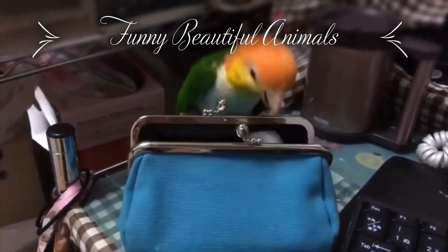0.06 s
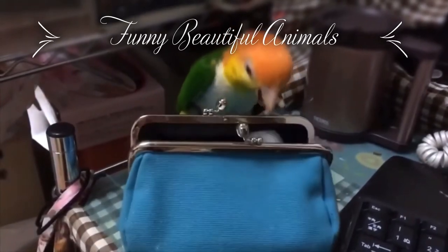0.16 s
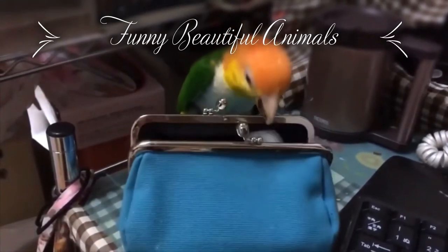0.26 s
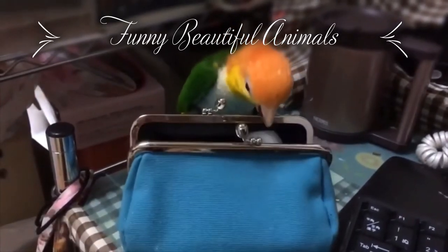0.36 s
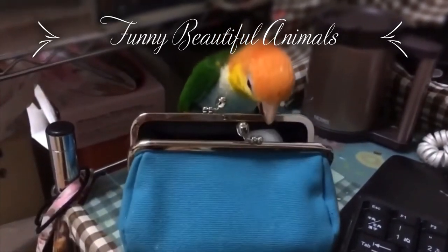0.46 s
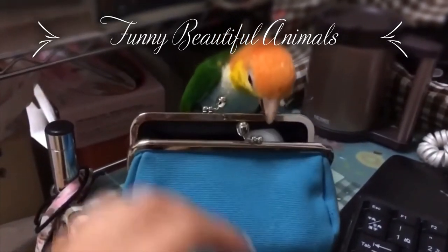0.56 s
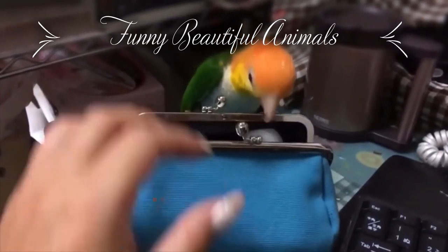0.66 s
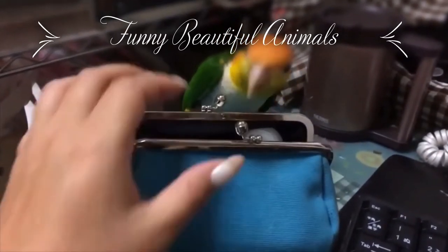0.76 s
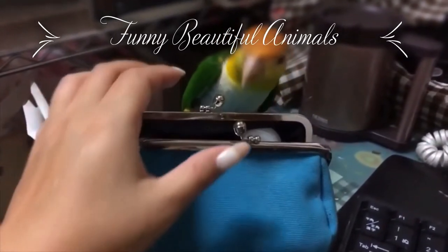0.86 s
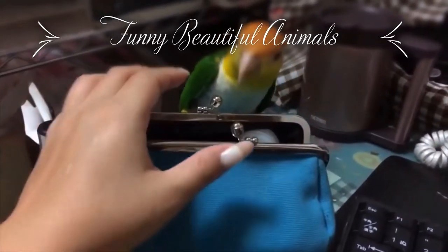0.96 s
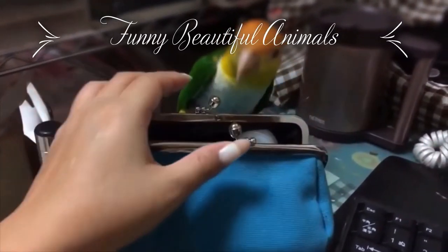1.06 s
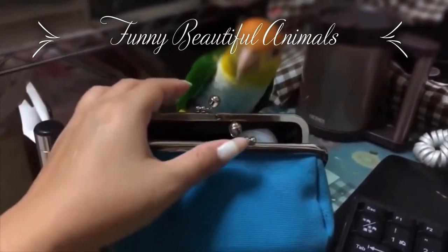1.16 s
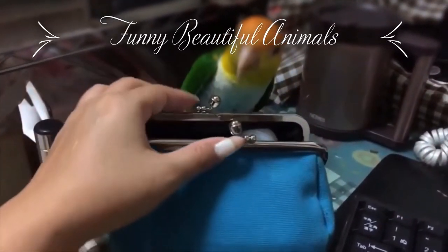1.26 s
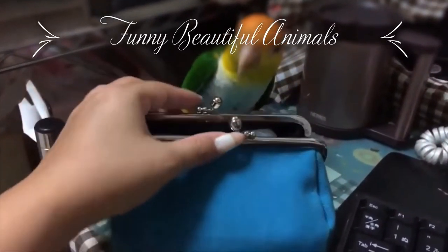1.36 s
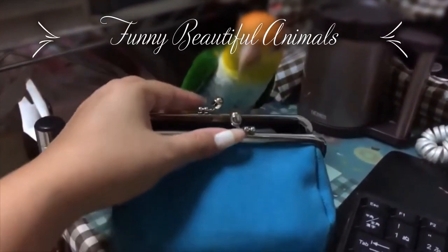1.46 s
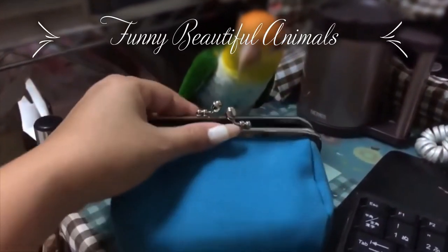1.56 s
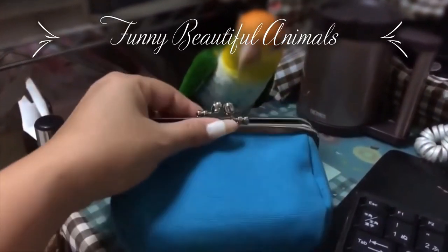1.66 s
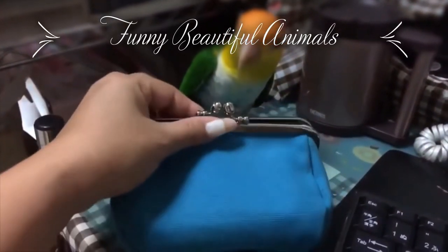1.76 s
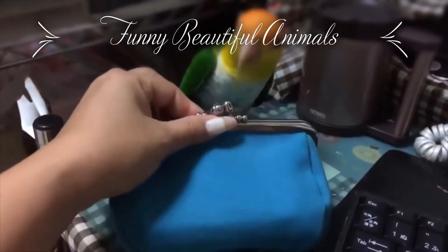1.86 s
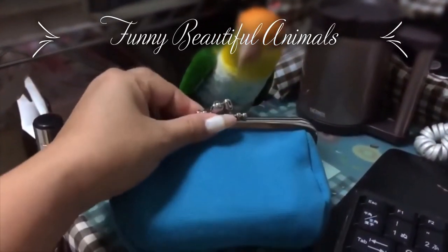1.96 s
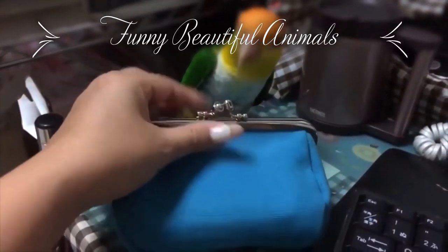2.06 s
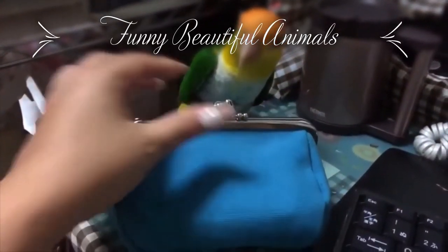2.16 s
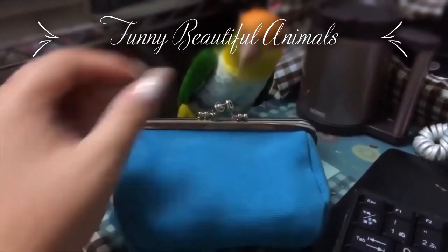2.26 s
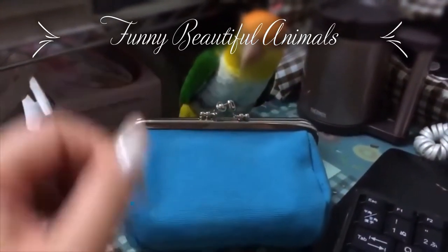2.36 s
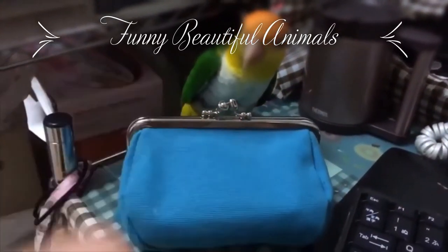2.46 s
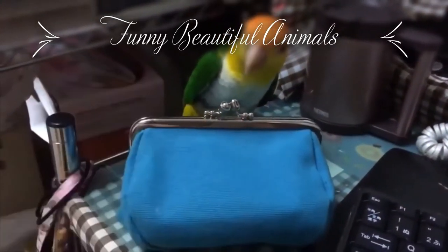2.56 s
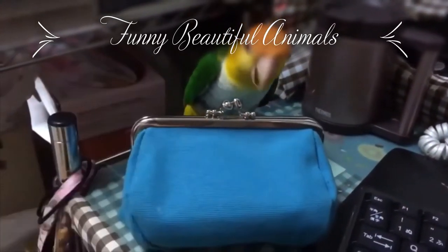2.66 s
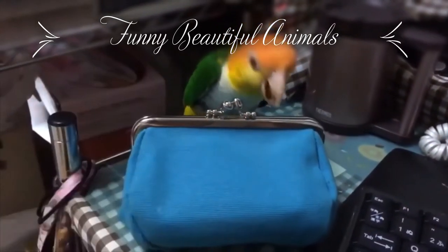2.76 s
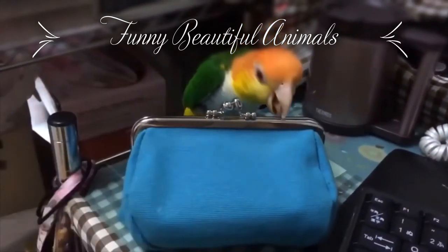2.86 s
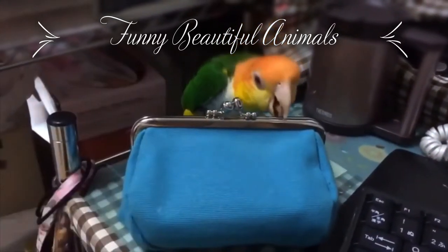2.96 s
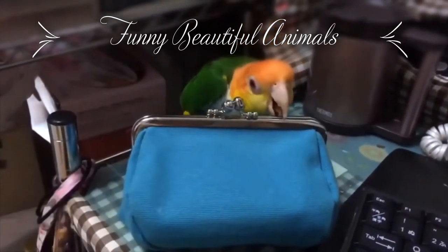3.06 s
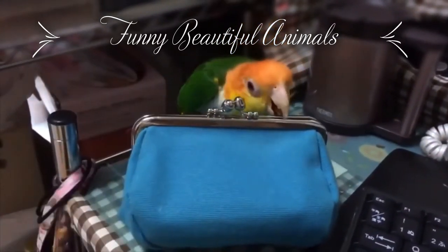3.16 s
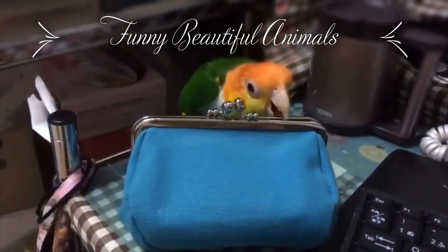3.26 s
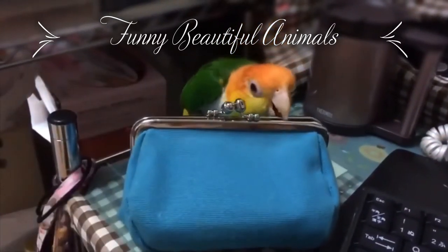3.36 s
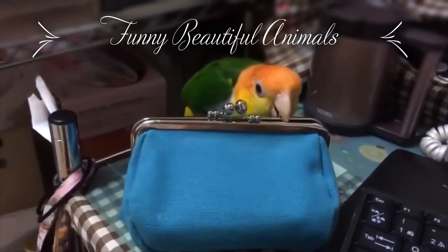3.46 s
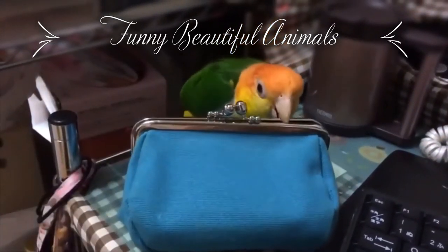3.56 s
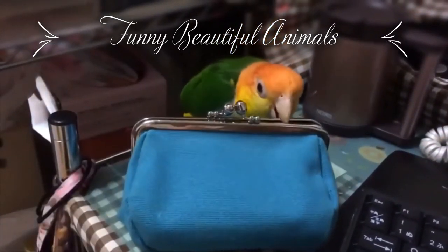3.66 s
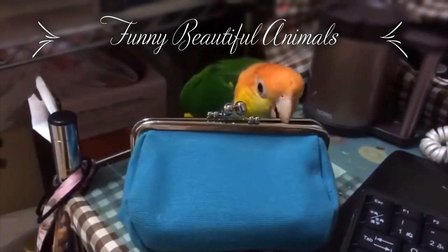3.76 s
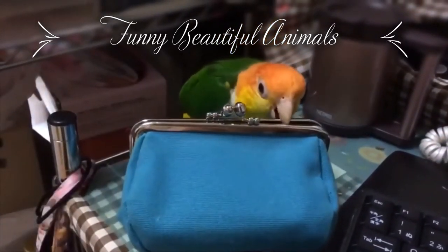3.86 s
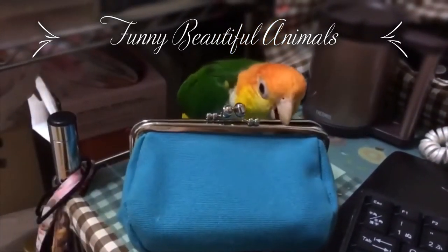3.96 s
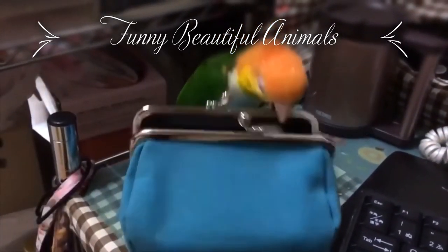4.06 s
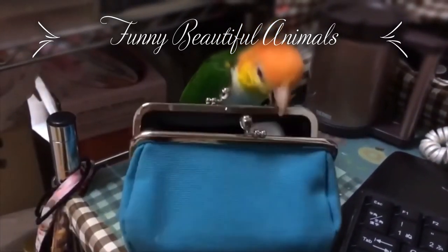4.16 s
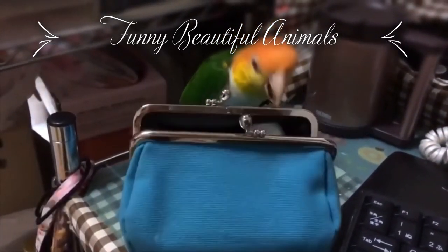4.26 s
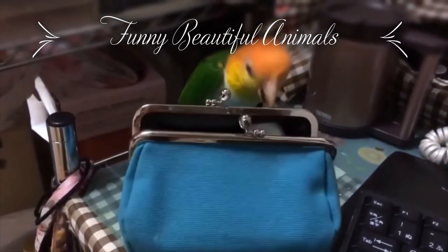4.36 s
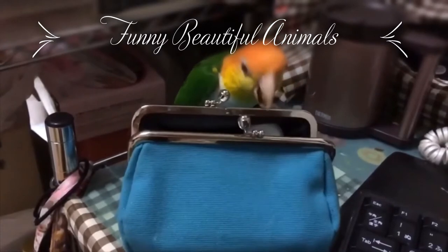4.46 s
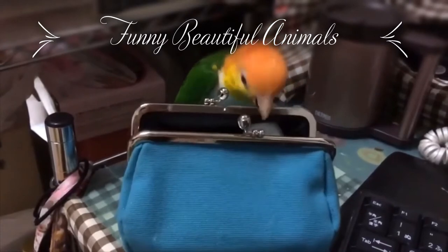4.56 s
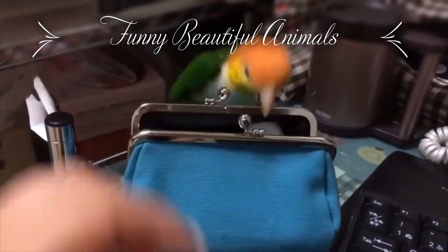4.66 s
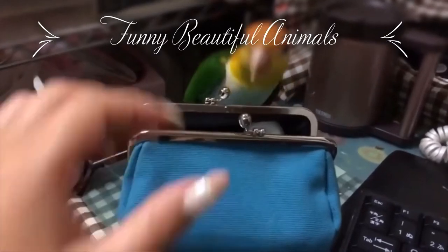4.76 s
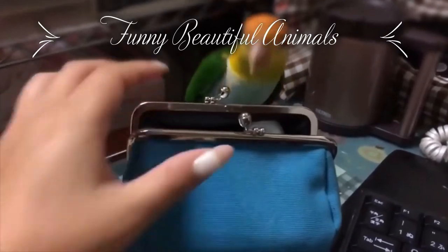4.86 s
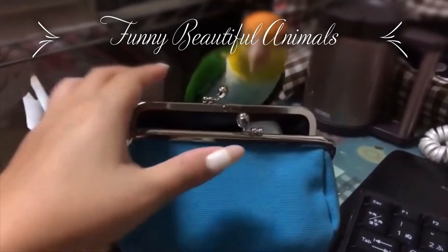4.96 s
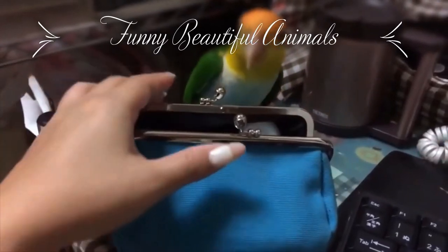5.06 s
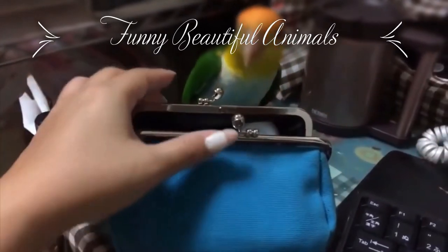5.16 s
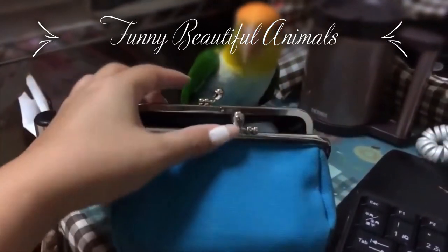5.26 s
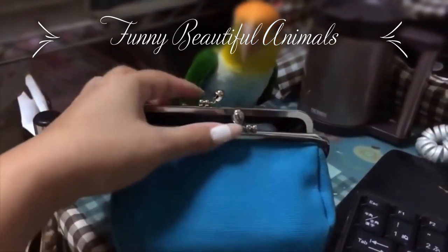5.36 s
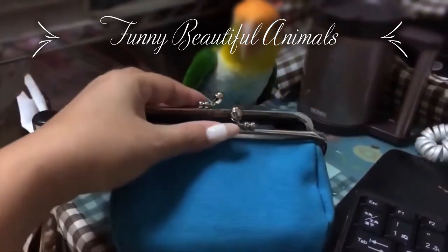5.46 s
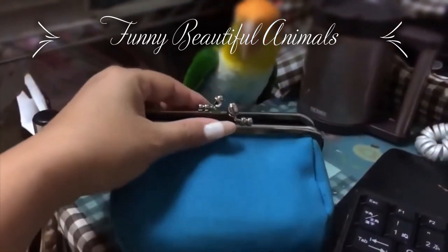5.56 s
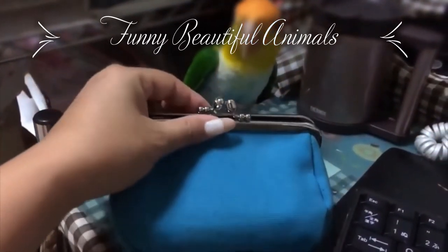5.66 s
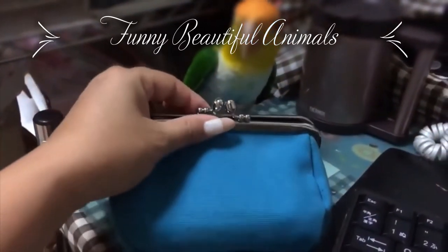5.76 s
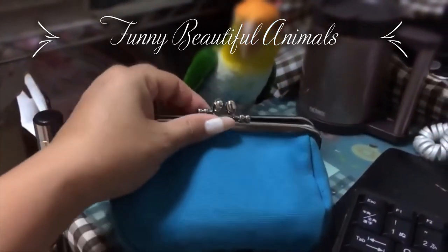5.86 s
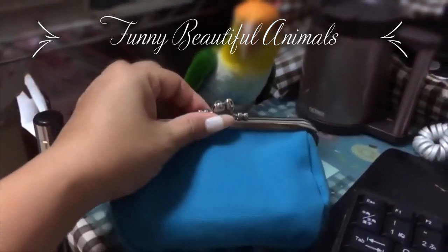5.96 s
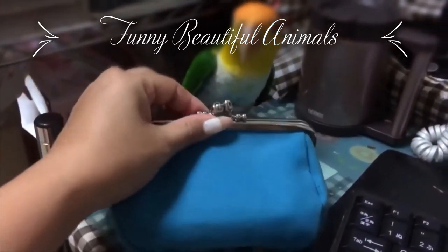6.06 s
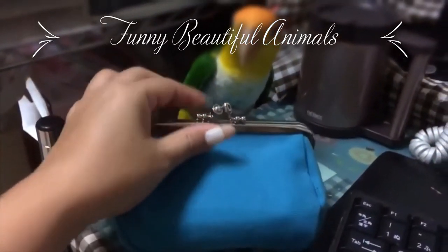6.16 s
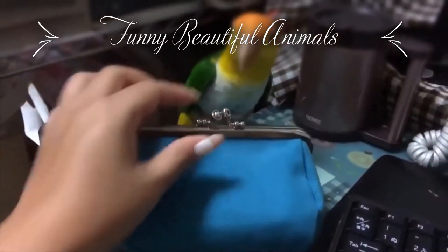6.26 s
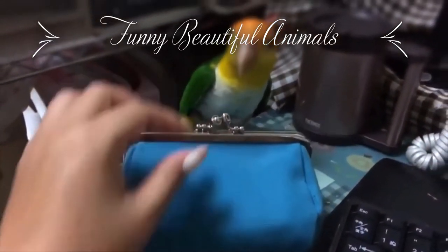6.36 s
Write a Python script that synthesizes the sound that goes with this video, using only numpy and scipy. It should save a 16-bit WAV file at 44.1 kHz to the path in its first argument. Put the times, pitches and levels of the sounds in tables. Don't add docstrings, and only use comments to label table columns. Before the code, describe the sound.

Quiet room noise with a low wavering hum. Tiny ticks, then one short falling parrot squawk. A bright metallic click precedes a hard, loud clasp snap with brief rattle. After sparse ticks and soft cloth rustle, the clasp springs open and more ticks cluster; the bird squeaks rapidly, then another click and equally loud snap. Close microphone, short indoor reflections.

```python
import sys
import numpy as np
from scipy import signal
from scipy.io import wavfile
from scipy.ndimage import uniform_filter1d

SR = 44100
rng = np.random.default_rng(int(sys.argv[2]) if len(sys.argv) > 2 else 0)


def persist_wave(psi):
    counts = np.round(np.clip(psi, -1, 1) * 32767).astype(np.int16)
    wavfile.write(sys.argv[1], SR, np.atleast_2d(counts).T)


def volts_from_decibels(level):
    exponent = np.asarray(level, float) / 20
    return 10 ** exponent


N = 283122

# f/Hz, level/dB
METAL_GRIT = [(300, -28.5), (900, -12), (1700, 1), (3300, -7), (6000, -4), (10000, -8.5), (13000, -11.5),
              (16000, -23)]


def evened(x):
    return x / np.sqrt(np.mean(x ** 2) + 1e-20)


def drift(count, span):
    return evened(uniform_filter1d(rng.standard_normal(count), span))


def slow_drift(count, span):
    smooth = uniform_filter1d(rng.standard_normal(count), span)
    return evened(uniform_filter1d(smooth, span))


def read(points, hz):
    f, value = np.transpose(points)
    return np.interp(np.log(hz + 1), np.log(f + 1), value)


def add(mix, s, sound):
    part = mix[round(s * SR):][:len(sound)]
    part += sound[:len(part)]


def resonate(x, hz, width):
    turn = np.exp(2j * np.pi * hz * np.arange(len(x)) / SR)
    r = np.exp(-np.pi * width / SR)
    return 2 * (turn * signal.lfilter([1 - r], [1, -r], x / turn)).real


def resonances(x, modes):
    return sum(volts_from_decibels(db) * resonate(resonate(x, f, w), f, w) for f, w, db in modes)


def noise(spectrum, count, patchy_db):
    hz = np.fft.rfftfreq(1024, 1 / SR)
    a, b, patches = rng.standard_normal((count // 256 + 5, 513, 3)).T
    patches = evened(uniform_filter1d(uniform_filter1d(patches, 12, 0), 10, 1))
    z = (a + 1j * b) * volts_from_decibels(read(spectrum, hz)[:, None] + patchy_db * patches)
    return evened(signal.istft(z, nperseg=1024, noverlap=768)[1][:count])


def ring(modes):
    t = np.arange(SR // 3) / SR
    return sum(volts_from_decibels(db - 60 * t / t60) * np.sin(2 * np.pi * hz * t) for hz, db, t60 in modes)


def blow(modes, rebounds, grit_db, grit_t60, grit_spectrum):
    kicks = np.zeros(300)
    for s, gain in rebounds:
        kicks[round(s * SR)] += gain
    out = signal.fftconvolve(kicks, ring(modes))[:4000]
    fade = volts_from_decibels(grit_db - 60 * np.arange(4000) / SR / grit_t60)
    grit = noise(grit_spectrum, count=4000, patchy_db=1.5) * fade
    return out / abs(out).max() + grit


def hum():
    # f/Hz, level/dB
    faint_lines = [(242.2, -68.5), (301.5, -72.5), (360.7, -77.5), (958.2, -75.5), (1104, -72.5),
                   (1674, -76)]
    # f/Hz, level/dB
    main_lines = [(58.35, -50.5), (120, -59.5)]
    # t/s, hold/s, change/dB
    dips = [(0, 0.19, -7.5), (0.608, 0.15, -4.5), (0.903, 0.34, -6), (1.961, 0.41, -10), (2.683, 0.41, -7),
            (3.225, .08, 0.5), (3.363, 0.045, -7.5), (4.594, 0.086, -6), (5.039, 0.1, -8.5),
            (5.62, .07, -4), (6.031, 0.18, -8.5)]
    fall_s, back_s, waver_s = 0.013, 0.11, 0.016
    t = np.arange(N) / SR
    dips_db = np.zeros(N)
    for s, hold, db in dips:
        dips_db += np.interp(t, [s - fall_s, s, s + hold, s + hold + back_s], [0, db, db, 0])
    out = np.zeros(N)
    for (hz, db), waver_db in zip(main_lines, (1.95, 3.0)):
        waver = slow_drift(N, round(waver_s * SR))
        out += volts_from_decibels(db + dips_db + waver_db * waver) * np.sin(2 * np.pi * hz * t)
    for hz, db in faint_lines:
        out += volts_from_decibels(db - 2.5 + .8 * dips_db) * evened(resonate(rng.standard_normal(N), hz, 3))
    return np.sqrt(2) * out


def air():
    # f/Hz, level/dB per Hz
    room_noise = [(15, -33), (25, -8), (66, -1), (131, -9.5), (172, -14), (245, -14), (651, -19.5),
                  (902, -21.5), (1120, -13.5), (1220, -18.5), (2400, -24.5), (2980, -33), (10400, -42.5),
                  (14400, -61), (16500, -74.5)]
    # f/Hz, width/Hz, level/dB
    fan_modes = [(1012, 180, -72.5), (1550, 540, -82), (300, 27, -79.5)]
    fan = np.zeros(N)
    for f, w, db in fan_modes:
        fan += volts_from_decibels(db) * evened(resonate(resonate(rng.standard_normal(N), f, w), f, w))
    hiss = volts_from_decibels(-81) * rng.standard_normal(N)
    return volts_from_decibels(-57.5) * noise(room_noise, count=N, patchy_db=2.32) + fan + hiss


def rustle():
    # start/s, peak/s, end/s, peak level/dB
    strokes = [
        (0, 0, 0.076, -59.5),
        (1.599, 1.7, 1.69, -61),
        (2.247, 2.49, 2.8, -72),
        (2.915, 2.96, 3.0, -72),
        (4.125, 4.127, 4.2, -48),
        (4.6, 4.612, 4.63, -53),
        (4.669, 4.695, 4.715, -56.5),
        (4.705, 4.77, 4.82, -54),
    ]
    # f/Hz, level/dB per Hz
    cloth = [(470, -40), (800, -8), (1660, -4.5), (1970, 4), (2570, -4.5), (8770, -11.5), (14700, -25.5),
             (16000, -30)]
    edge_db = -15.5
    out = np.zeros(N)
    for start, peak, end, db in strokes:
        t = np.arange(start, end, 1 / SR)
        level_db = db + np.interp(t, [start, peak, end], [edge_db, 0, edge_db])
        grain = volts_from_decibels(2.5 * drift(len(t), 200))
        brush = evened(grain * noise(cloth, count=len(t), patchy_db=-2.5))
        add(out, max(start, 0), volts_from_decibels(level_db) * brush * signal.windows.tukey(len(t), .1))
    return out


def ticks():
    # t/s, peak level/dB, f/Hz
    tick_events = [(0.3794, -51, 2690), (.4324, -44, 2100), (0.461, -53, 2280), (0.629, -49.5, 2250),
                   (.683, -57, 5000), (0.723, -52, 3350), (1.671, -53, 3400), (1.917, -45.5, 8500),
                   (2.934, -48, 3470), (2.969, -36, 2620), (3.051, -48, 2350), (3.589, -50, 3360),
                   (3.865, -51, 2308), (3.8982, -42.5, 2200), (4.143, -32, 4300), (4.166, -49, 3900),
                   (4.174, -39, 4100), (4.201, -49.5, 2500), (4.3244, -43.5, 2290), (4.466, -37.5, 3900),
                   (4.505, -45.5, 3984), (4.5645, -38, 4800), (4.616, -33.5, 2400), (4.6376, -62, 7000),
                   (4.6992, -41, 3030), (4.758, -47, 3460), (5.667, -52, 3400), (5.714, -50, 4960),
                   (5.985, -38, 8500)]
    scrape_s, ring_cycles = .007, 20
    out, t = np.zeros(N), np.arange(2000) / SR
    for s, db, hz in tick_events:
        length_s = np.clip(scrape_s + ring_cycles / hz, .003, .06)
        scratch = rng.standard_normal(2000) * volts_from_decibels(-60 * t / length_s)
        dull = evened(resonate(scratch, 3000, 4900))
        pitched = evened(resonate(scratch, hz, 700) + 0.32 * resonate(scratch, 0.8 * hz, 600))
        tick = 0.25 * dull + pitched
        add(out, s, volts_from_decibels(db) * tick / abs(tick).max())
    return out


def call(rows, trill_hz, trill_depth, rough_high):
    # f/Hz, width/Hz, level/dB
    throat_modes = [(1800, 1900, 6), (3130, 2400, 11), (4800, 1300, 14), (8350, 450, 10.5)]
    rough_low, break_hz, break_width_hz = 0.35, 2090, 430
    beat_sag = .15
    s, *columns = np.transpose(rows)
    t = np.arange(s[0], s[-1], 1 / SR)
    level_db, hz = (np.interp(t, s, c) for c in columns)
    pressed = .5 - .5 * np.tanh((hz - break_hz) / break_width_hz)
    rough = np.clip(rough_high + (rough_low - rough_high) * pressed, 0, 1)
    depth = trill_depth * np.clip(5 * rough, 0, 1)
    effort = volts_from_decibels(level_db - level_db.max())

    beat = np.cos(2 * np.pi * trill_hz * (t - t[0]) + 0.26 * drift(len(t), 600))
    jitter = (.012 + .15 * rough) * slow_drift(len(t), 40)
    hz = hz * (1 - beat_sag * effort * depth * (.5 + .5 * beat) + jitter)
    turns = np.cumsum(hz) / SR
    sharp = np.clip(4.0 * rough, 0, 1)
    pulses = -sum(sharp ** max(k - 2, 0) * np.cos(2 * np.pi * k * turns) for k in range(1, 6))
    breath = 1.6 * rough * rng.standard_normal(len(t))
    voice = evened(resonances(evened(pulses) + breath, throat_modes))
    chop = 1 - np.clip(depth, 0, 1) * (1 - (.5 + .5 * beat) ** 1.7)
    return s[0], volts_from_decibels(level_db) * voice * chop * signal.windows.tukey(len(t), .1)


def parrot():
    # t/s, level/dB, f/Hz
    calls = [
        [(.775, -77, 2350), (.812, -54.5, 2756), (.83, -49.5, 2350), (.845, -42, 2008), (.86, -38, 1876),
         (.864, -40.5, 1720), (.88, -37, 1730), (.893, -56, 1580)],
        [(5.0546, -65, 2790), (5.08, -53.5, 2810), (5.09, -46, 2745), (5.096, -41.5, 2764), (5.103, -56, 3290),
         (5.114, -52, 3400)],
        [(5.109, -57, 2966), (5.131, -46.5, 2850), (5.155, -46.5, 2854), (5.17, -54.5, 2900),
         (5.205, -64, 3140)],
        [(5.21, -70, 3920), (5.225, -67, 4170), (5.248, -66, 3470)],
        [(5.248, -54, 3050), (5.262, -45.5, 2900), (5.303, -51.5, 2930), (5.315, -72, 2750)],
        [(5.265, -47, 2450), (5.292, -53, 2390), (5.304, -58, 2350)],
    ]
    # trill rate/Hz, depth 0-1, roughness of high notes 0-1
    trills = [(185, 0.4, .06), (141, 0.76, 0.45), (87, 0.86, 0.46), (110, .7, 0.1), (142.2, 0.9, 0.1),
              (121, 1, 0.1)]
    out = np.zeros(N)
    for rows, trill in zip(calls, trills):
        add(out, *call(rows, *trill))
    return out


def frame_thumps():
    # t/s, peak level/dB, f/Hz, t60/s
    thumps = [(1.686, -42, 930, 0.012), (1.921, -26, 300, 0.01), (2.935, -43.5, 460, 0.036),
              (2.968, -40, 597, 0.0087), (4.148, -28, 182.9, 0.062), (4.152, -41.5, 230.4, 0.18),
              (4.15, -33, 970, 0.034), (4.762, -44.5, 786, 0.015), (5.668, -49, 1260, 0.0098),
              (5.988, -32.5, 300, 0.023), (5.997, -28.5, 84, 0.096), (1.93, -38, 85, 0.1),
              (5.672, -47.5, 846, 0.043)]
    out = np.zeros(N)
    for s, db, hz, t60 in thumps:
        add(out, s, volts_from_decibels(db) * ring([(hz, 0, t60), (2.3 * hz, -10, .5 * t60)]))
    return out


def ball_touches():
    # t/s, peak level/dB
    touches = [
        (1.7177, -16),
        (1.9038, -27),
        (5.7376, -13.5),
        (5.9736, -27),
    ]
    # f/Hz, level/dB, t60/s
    ball_modes = [(1390, -12, .02), (1620, -16, .012), (3500, -5, 0.005), (4150, -1, .005),
                  (5155, 1, 0.005), (6460, -5, .003), (7950, -6, 0.005), (9390, -6, 0.006),
                  (10600, -10, .004)]
    # f/Hz, level/dB
    bright_grit = [(1500, -30), (2500, -28), (3600, -6), (5200, 0), (10000, -3), (16000, -18)]
    rebounds = [(0, 1), (.0007, 0.15), (.0013, -.15), (.0042, 0.12)]
    out = np.zeros(N)
    for s, db in touches:
        add(out, s, volts_from_decibels(db) * blow(ball_modes, rebounds, -18, 0.016, bright_grit))
    return out


def spring_open():
    # t/s, peak level/dB
    slips = [
        (4.1215, -34),
        (4.1236, -19),
        (4.1243, -18),
        (4.1251, -18),
        (4.1261, -11.5),
        (4.1271, -18),
        (4.1282, -18),
        (4.1294, -19),
        (4.1308, -25),
    ]
    # f/Hz, level/dB, t60/s
    slip_modes = [(650, -19, 0.015), (1150, -12, .015), (2100, -1, 0.005), (3400, 4, 0.006),
                  (4100, 4, 0.006), (5600, 0, .004), (7000, 1, 0.003), (9000, -2, 0.003),
                  (11500, -2, 0.003), (14000, -5, .003)]
    out = np.zeros(N)
    for k, (s, db) in enumerate(slips):
        add(out, s, (-1) ** k * volts_from_decibels(db) * blow(slip_modes, [(0, 1)], -13, 0.008, METAL_GRIT))
    return out


def snaps():
    # t/s, peak level/dB, frame rattle level/dB
    snap_events = [
        (1.93, 0, -26),
        (5.997, -1, -25.5),
    ]
    # f/Hz, level/dB, t60/s
    snap_modes = [(403, -9, .012), (1220, -1.5, .005), (2350, -13.5, 0.014), (3510, -6, 0.0084),
                  (4830, -11.5, 0.011), (7234, -12, .007), (8500, -10, 0.008), (9550, -11.5, 0.0054),
                  (11010, -12.5, 0.007)]
    # f/Hz, width/Hz, level/dB
    frame_modes = [(1540, 210, -8.5), (2270, 160, 0.5), (2420, 100, -5), (3400, 200, -6.5), (4100, 350, -7),
                   (11000, 230, -11)]
    # f/Hz, level/dB per Hz
    coins = [(120, -51.5), (200, -19.5), (702, -14), (842, -15), (1330, -7), (1590, -13.5), (2210, -5),
             (6710, -14), (11200, -13.5), (15500, -25)]
    rebounds = [(0, .45), (.00016, -1), (.0011, .35), (.0017, -.25)]
    out, t = np.zeros(N), np.arange(SR // 4) / SR
    count = len(t)
    for s, db, rattle_db in snap_events:
        add(out, s, volts_from_decibels(db - 2.3) * blow(snap_modes, rebounds, -14, .012, METAL_GRIT))
        knocks = rng.standard_normal(count) * (rng.random(count) < .008)
        knocks *= volts_from_decibels(1.2 * drift(count, 250))
        rattle = evened(resonances(knocks, frame_modes))
        scatter = noise(coins, count=count, patchy_db=3.0) * volts_from_decibels(1.9 * drift(count, 200))
        swell = 1 - np.exp(-(t / 0.0083) ** 2)
        add(out, s, volts_from_decibels(rattle_db - 60 * t / 0.17) * swell * (0.83 * rattle + scatter))
    return out


def room(x):
    # f/Hz, t60/s
    decay = [(100, 0.053), (400, 0.15), (1000, 0.1), (2300, 0.1), (5000, 0.27), (10000, 0.086),
             (16000, 0.03)]
    # f/Hz, level/dB
    colour = [(100, -4.5), (700, -7.5), (1200, 4), (2300, 6), (3500, -1.5), (6000, -3), (11000, 4),
              (16000, 0)]
    build_up_s = .011
    taps = np.zeros(SR // 2)
    at = np.arange(100, SR // 2 - 10, 10)
    taps[at + rng.integers(0, 10, len(at))] = rng.choice([-1., 1.], len(at))
    taps *= 1 - np.exp(-(np.arange(len(taps)) / (build_up_s * SR)) ** 2) + 0.47
    hz, t, z = signal.stft(taps, SR, nperseg=256)
    z = z * volts_from_decibels(read(colour, hz)[:, None] - 60 * t / read(decay, hz)[:, None])
    tail = signal.istft(z, SR, nperseg=256)[1]
    return signal.fftconvolve(x, tail / np.linalg.norm(tail))[:N]


def ducked(floor, loud):
    power_db = 10 * np.log10(abs(uniform_filter1d(loud ** 2, 800)) + 1e-12)
    fall_db = np.arange(N) * 60. / SR
    held_db = np.maximum.accumulate(power_db + fall_db) - fall_db
    over_db = np.maximum(held_db + 39.0, 0)
    return floor / volts_from_decibels(.4 * uniform_filter1d(over_db, 800))


def scene():
    room_db = {"snap": -15, "small": -18, "bird": -20}
    bird, snap = parrot(), snaps()
    small = frame_thumps() + ball_touches() + spring_open() + ticks()
    wet = room(volts_from_decibels(room_db["snap"]) * snap + volts_from_decibels(room_db["small"]) * small + volts_from_decibels(room_db["bird"]) * bird)
    background = hum() + rustle() + ducked(air(), snap + small + wet)
    return np.array([snap + small + bird + wet + background])


def treble_holes(x):
    # t/s, lower edge f/Hz
    holes = [(.189, 3000), (.258, 6000), (1.767, 6000), (2.002, 5500), (2.139, 5000), (2.348, 6500),
             (2.719, 9000), (2.854, 3000), (3.023, 3000), (4.183, 5000), (4.219, 5000), (4.69, 8000),
             (5.69, 7500), (6.161, 5500), (6.225, 3500)]
    length_s, share_lost = .018, .92
    out, span = x.copy(), round(length_s * SR)
    for s, hz in holes:
        at = round(s * SR) - span // 2
        highpass = signal.butter(4, hz, "high", fs=SR, output="sos")
        high = signal.sosfiltfilt(highpass, x[0, at - span:at + 2 * span])
        out[0, at:at + span] -= share_lost * signal.windows.tukey(span, .7) * high[span:2 * span]
    return out


def roll_off(x):
    return signal.sosfilt(signal.butter(12, 16810, fs=SR, output="sos"), x)


def record(dry):
    heard = signal.sosfilt(signal.butter(2, 42, "high", fs=SR, output="sos"), dry)
    top_edge = signal.firwin(numtaps=161, cutoff=15500, fs=SR)
    heard = signal.oaconvolve(heard, top_edge[None], "same")
    return roll_off(treble_holes(heard))


dry = scene()
out = record(dry)
persist_wave(out)
```